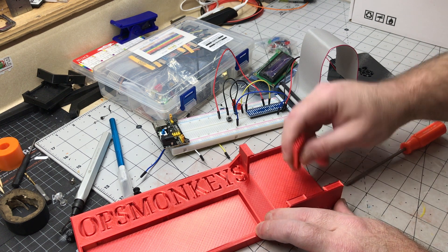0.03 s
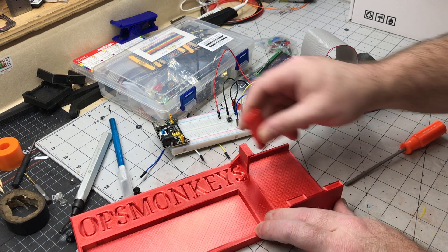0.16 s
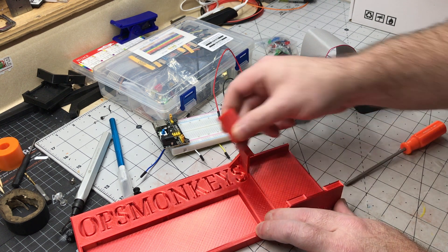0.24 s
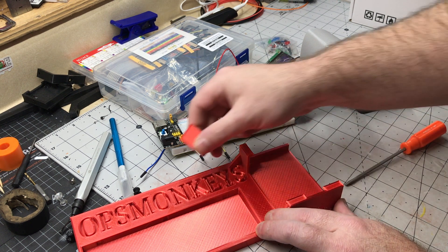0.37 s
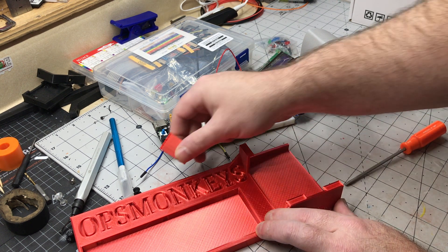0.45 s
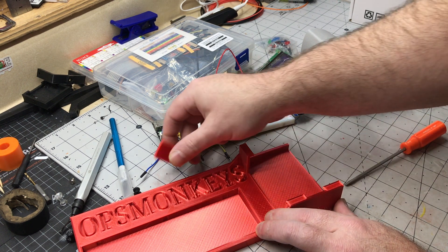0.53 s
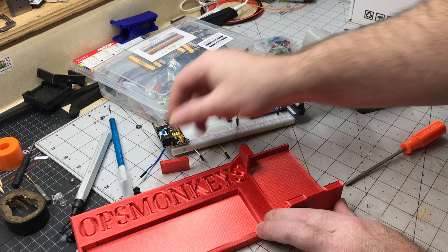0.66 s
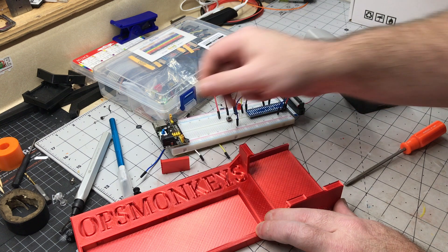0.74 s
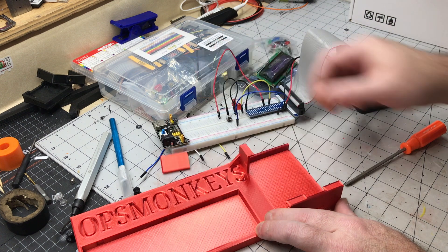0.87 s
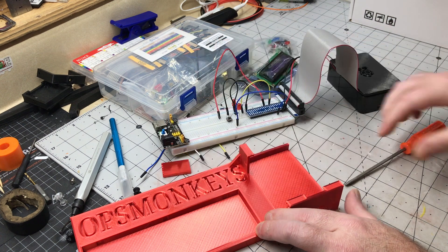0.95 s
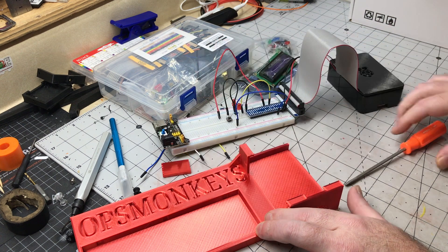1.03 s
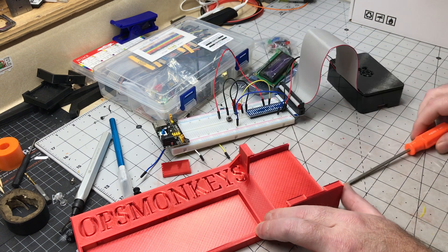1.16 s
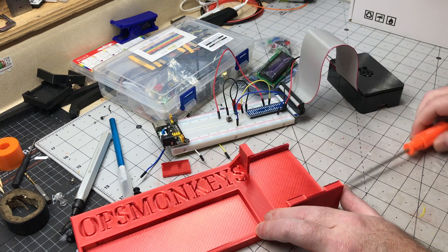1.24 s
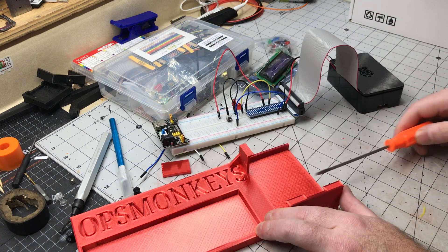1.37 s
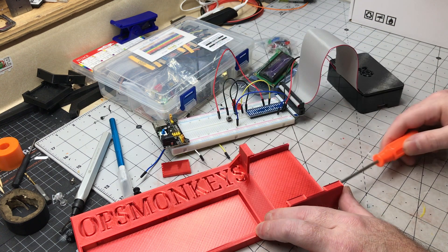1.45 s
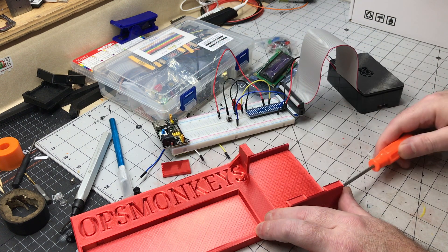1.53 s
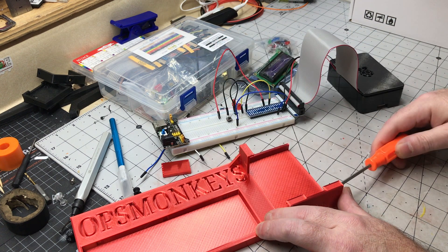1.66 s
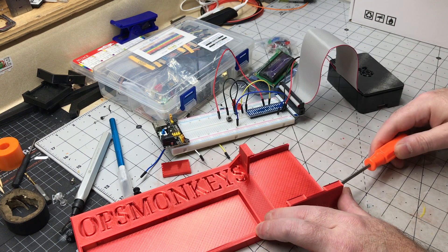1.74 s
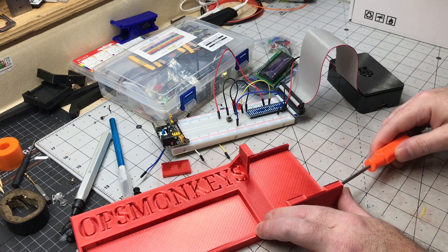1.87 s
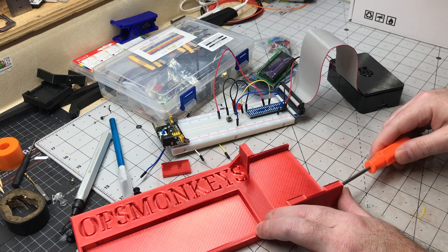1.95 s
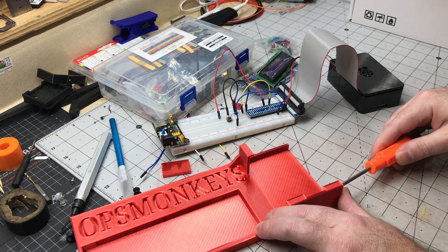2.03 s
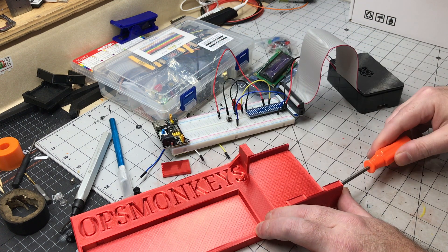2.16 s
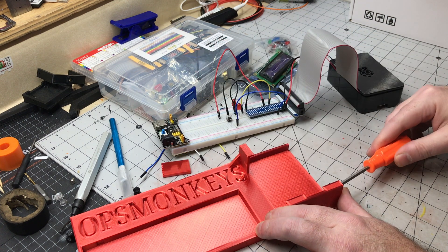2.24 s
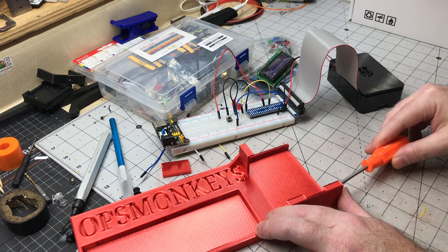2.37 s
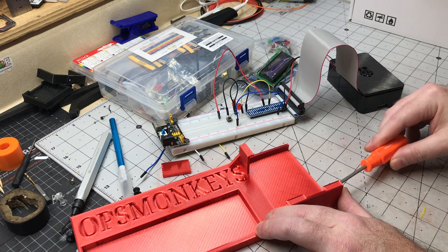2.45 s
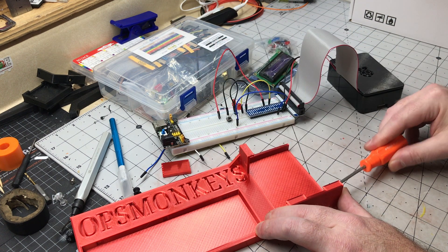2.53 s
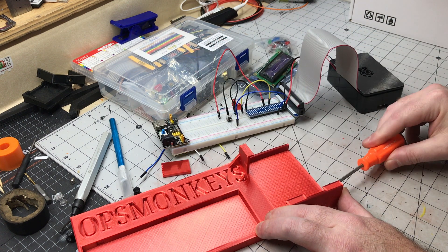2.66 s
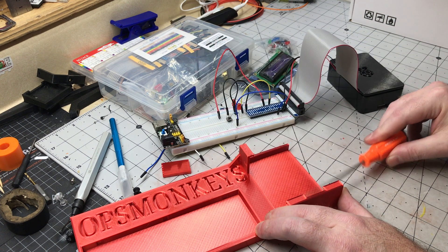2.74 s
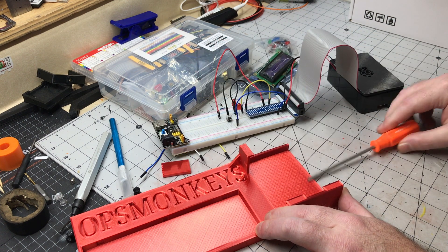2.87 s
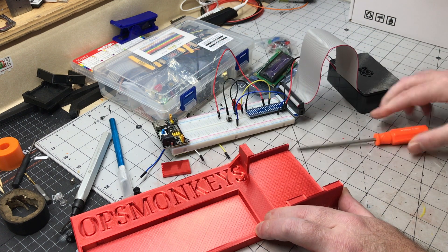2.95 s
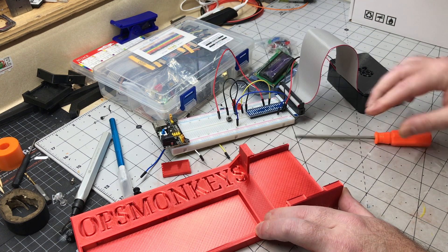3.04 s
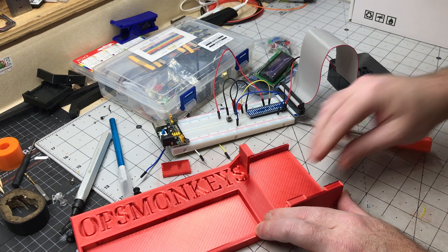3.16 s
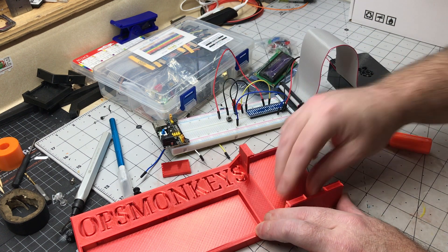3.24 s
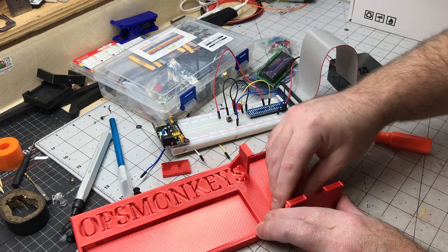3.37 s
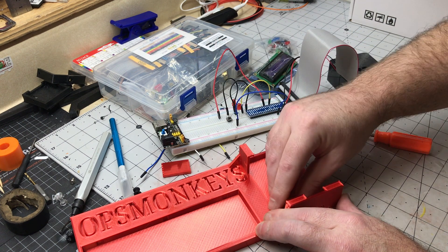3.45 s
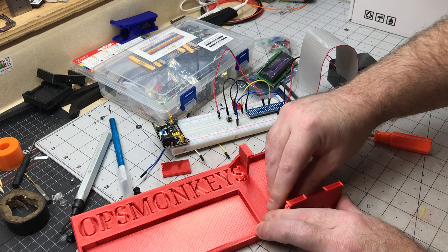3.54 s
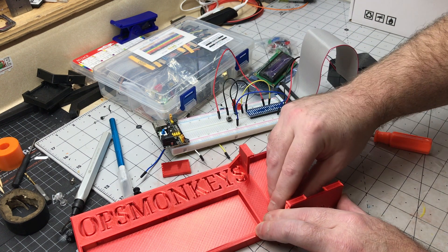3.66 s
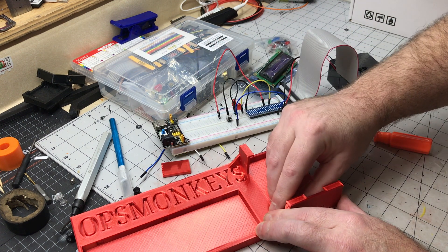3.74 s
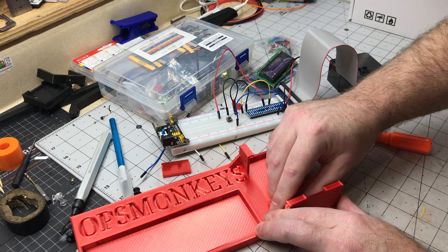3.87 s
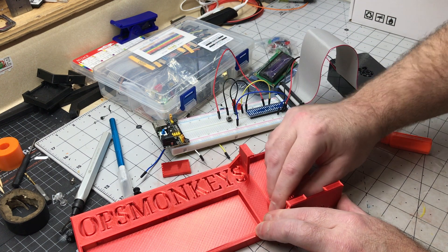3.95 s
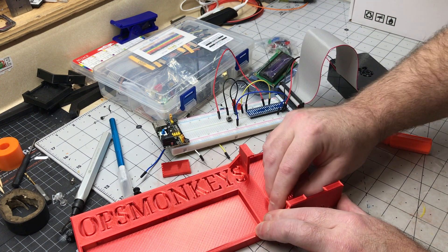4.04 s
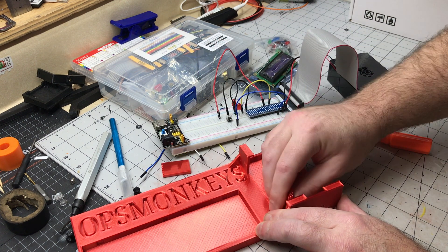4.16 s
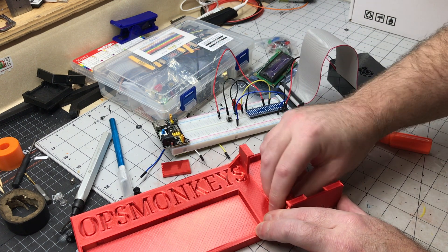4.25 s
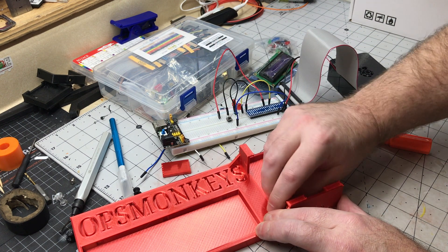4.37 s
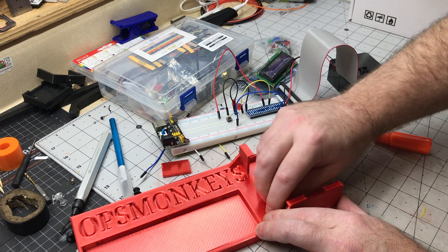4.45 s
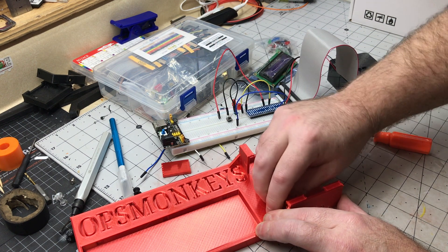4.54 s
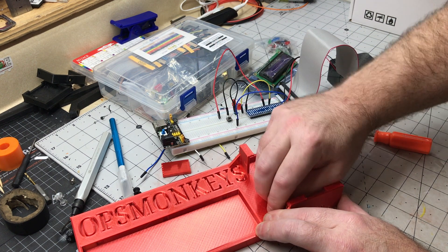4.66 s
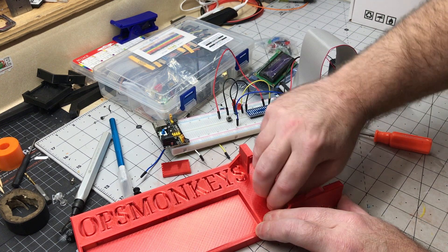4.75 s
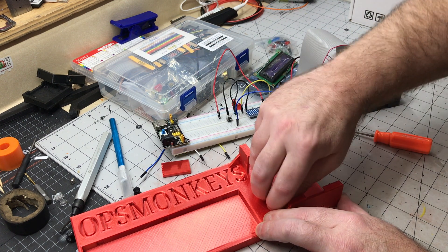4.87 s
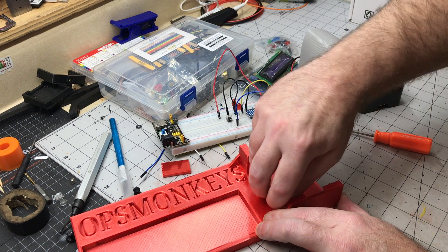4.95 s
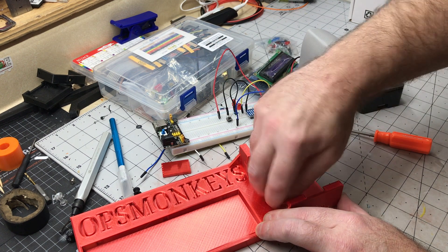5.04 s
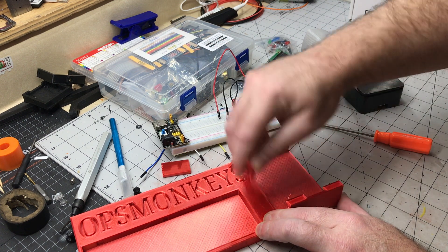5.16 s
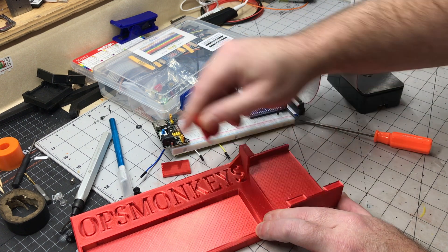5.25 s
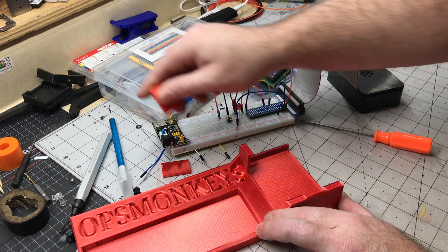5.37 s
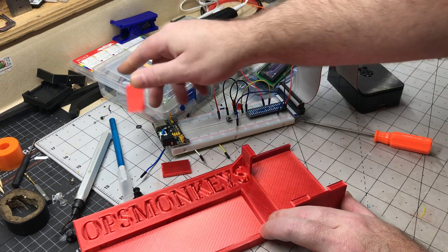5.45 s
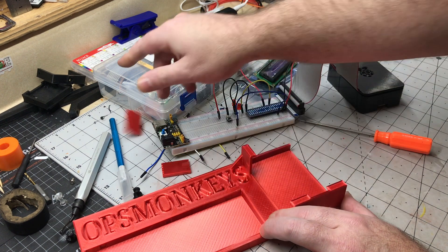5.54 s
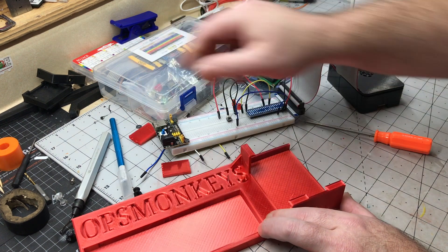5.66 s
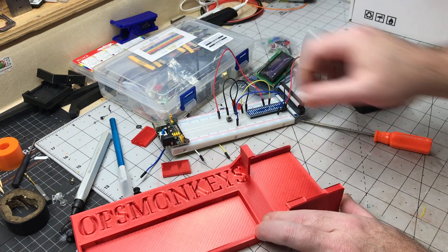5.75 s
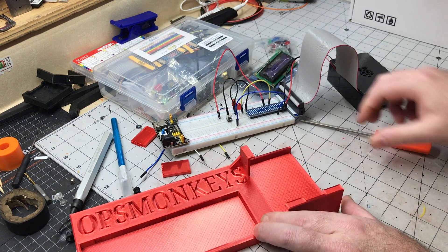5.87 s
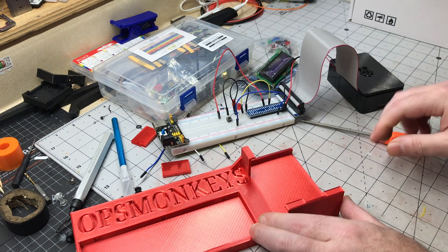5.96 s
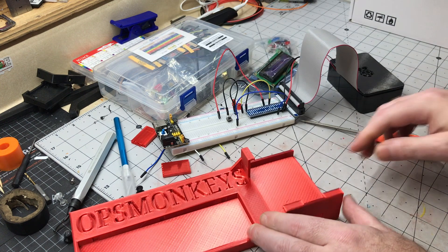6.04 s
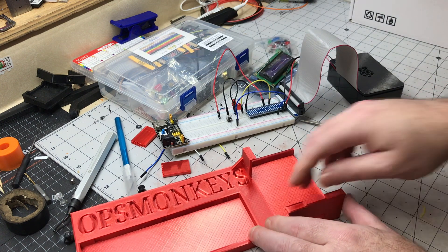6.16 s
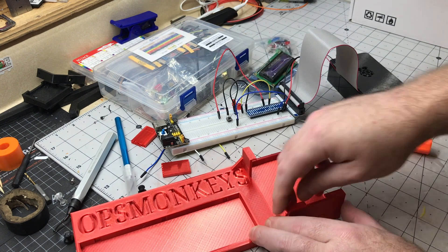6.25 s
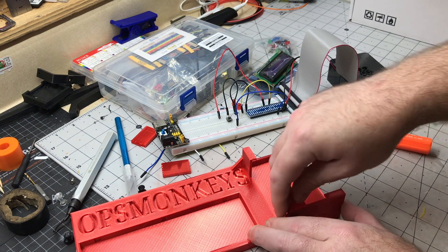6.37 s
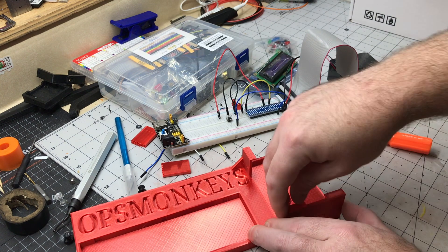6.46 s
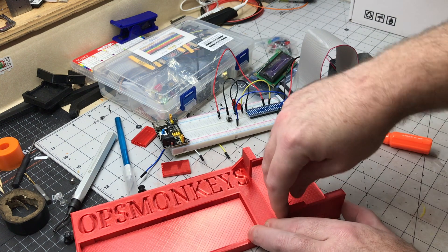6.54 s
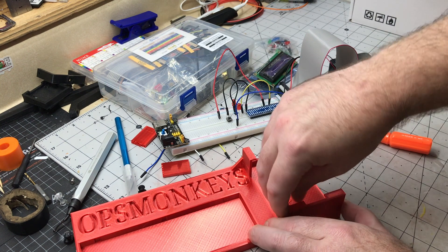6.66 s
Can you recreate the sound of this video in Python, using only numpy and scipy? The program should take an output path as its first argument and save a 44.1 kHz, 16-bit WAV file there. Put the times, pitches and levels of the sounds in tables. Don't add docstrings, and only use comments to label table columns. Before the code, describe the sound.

In a quiet small room, a plastic scrap drops and rattles on a bench mat. A screwdriver clicks into a plastic part, pries with bright crackles and scrapes, and is laid down with a dull knock. Fingers twist faintly with isolated clicks, a support snaps off sharply, and the tossed piece clatters. A few knocks follow, then near silence. Close microphone, dry, short reflections.

```python
import sys
import numpy as np
from scipy import signal
from scipy.fft import rfft, irfft, next_fast_len
from scipy.io import wavfile
from scipy.ndimage import uniform_filter1d, map_coordinates

SR = 44100
rng = np.random.default_rng(int(sys.argv[2]) if len(sys.argv) > 2 else 0)


def transcribe(signal):
    frames = np.atleast_2d(signal).T
    limited = np.clip(frames, -1, 1)
    pcm = np.round(limited * 32767).astype(np.int16)
    wavfile.write(sys.argv[1], SR, pcm)


def voltage_ratio(decibels):
    exponent = np.asarray(decibels, float) / 20
    return 10 ** exponent


N = 295548
SIZE = 16384
HZ = np.fft.rfftfreq(SIZE, 1 / SR)

# t/s, level/dB
HUSH = [(0, -63.5), (.6, -65.5), (1.1, -58), (2.2, -63), (3.3, -58), (3.8, -64), (4.5, -56.5), (5.3, -63),
        (6.4, -57.5)]
# f/Hz, density/dB
AIR = [(26, -64), (45, -22.5), (109, -6), (158, -12.5), (183, -4.5), (306, -2.5), (453, -8.5), (741, -11.5),
       (5040, -34.5), (7470, -41.5), (10500, -42), (16000, -41.5)]
# f/Hz, density/dB
SKIN = [(600, 0), (1500, 2), (3000, -2), (4600, -3), (5800, -1), (7500, -18), (12500, -18), (16000, -20)]
# t of peak/s, level/dB, rise/s, fall/s
SLIDES = [
    (1.14, -54, .15, .45),
    (4.4, -58, .3, 1.4),
    (5.25, -61, .2, .9),
    (6.7, -61, .7, .11),
]
# f/Hz, t60/s
WALLS = [(200, 0.088), (2000, 0.18), (6000, 0.13), (14000, 0.033)]
# t/s, peak/dB
THUDS = [
    (1.048, -58.5),
    (2.886, -47.5),
    (3.298, -70),
    (3.529, -64.5),
    (3.904, -69),
    (4.08, -62),
    (5.023, -53.5),
    (6.047, -61.5),
]

# t/s, peak/dB, favoured mode f/Hz (optional), treble/dB
TICK_HITS = [
    (0.1012, -45, 7000, -23),
]
FLICK_HITS = [
    (0.866, -33, 6550, -4),
    (0.8914, -24, -18),
]
DROP_HITS = [(0.547, -55, 3100, -10), (0.5525, -46, -15), (0.5593, -23, 3200, -22), (0.577, -22, -25),
             (0.5824, -19, -23), (0.5985, -15, -31), (0.627, -10, 2400, -24), (0.6574, -20.5, -28),
             (0.6724, -28, -40)]
LIFT_HITS = [(1.0555, -56, 1220, -4), (1.0984, -40, -20), (1.1055, -28, -34), (1.114, -34, 2300, -38),
             (1.1196, -31, 560, -38)]
SLOT_HITS = [(1.5136, -30, 4680, -14), (1.5213, -31, -14), (1.5522, -13, 4680, -13), (1.5585, -22, -24),
             (1.6314, -24, 4680, -28), (1.6395, -33, 1200, -26)]
PUSH_HITS = [(1.934, -33, 7170, 12), (1.9375, -38, 10), (1.9846, -38, 10), (1.99, -40, 12),
             (2.0005, -44, 10), (2.0309, -24, 1800, -8), (2.0647, -14, -1), (2.1224, -42, 2.5),
             (2.1314, -33.5, 4), (2.1395, -16, 2000, -6), (2.1524, -30, 4), (2.1824, -24.5, 1)]
PRY_HITS = [(2.2445, -12, -9), (2.2491, -24, 2), (2.2736, -6, -14), (2.2752, -8, 3200, -16),
            (2.2929, -21, 3260, -11.5), (2.2982, -31, 4700, -13.5), (2.3184, -15, 5230, -7.5),
            (2.372, -29, 6660, 4), (2.3807, -28, 13200, 8), (2.3862, -24, 4630, 0),
            (2.4994, -35.5, 5750, 0)]
PULL_HITS = [(2.6727, -22.5, 5870, -16), (2.6824, -32, -12.5), (2.6995, -31, -8), (2.7863, -38, 1910, -8),
             (2.797, -25, -14.5), (2.8013, -27, -14), (2.8202, -22, 1960, -20), (2.8242, -22, 1960, -16)]
SCRAPE_HITS = [(2.8412, -16, -19.5), (2.8639, -14, -22), (2.8682, -24, -14), (2.878, -23, -10)]
LAY_HITS = [(2.8888, -12.5, -21), (2.9048, -15, 2130, -20), (2.9414, -30, -26), (2.9494, -31, 2100, -20)]
TWIST_HITS = [(3.1857, -50, 1355, -26), (3.4371, -55, 1727, -16), (3.447, -53, -26),
              (3.684, -60, 3200, -22), (3.867, -64, 5400, -4), (3.879, -56, 5400, -12),
              (3.8927, -19, 5470, -12), (4.0678, -37, 1500, -30), (4.0823, -16.5, -22), (4.3476, -29, -10),
              (4.5604, -38.5, -1.5), (4.567, -24, -22), (4.584, -28.5, -15.5), (4.8384, -35, -12),
              (4.8922, -32.5, -19), (6.4585, -35, -11.5), (6.6163, -32.5, -28)]
SNAP_HITS = [
    (5.002, -22, -8),
    (5.0165, -8.5, -9),
    (5.0242, -16, -10),
    (5.033, -26, -8),
    (5.0394, -26.5, -5),
]
REST_HITS = [(3.5244, -56, -15.5), (5.4543, -58, -20), (5.4925, -52, -20), (5.515, -48, -20),
             (5.535, -50, -20)]
TOSS_HITS = [(5.5152, -24, -16.5), (5.5525, -17, -15.5), (5.6083, -23, -18), (5.6146, -22.5, -9),
             (5.6404, -29, 6200, -4), (5.6555, -31, -20), (5.5072, -30, -25), (5.5327, -21, -16),
             (5.5388, -21, -16), (5.5552, -12, 1850, -14), (5.568, -25, -20)]
SETTLE_HITS = [(5.6729, -25, 1990, -11), (5.681, -41, -24), (5.7022, -31, 6000, -8), (5.7207, -22, -38),
               (5.727, -30, -38), (5.7512, -32, 6900, -6), (5.754, -27, 3300, -26), (5.767, -39, 3300, -28)]
NUDGE_HITS = [(5.9483, -35, 3100, -25), (5.9589, -23, 1500, -17), (5.9638, -17, 1500, -28),
              (5.9778, -30, -22), (6.0235, -27, -38), (6.0372, -14, -26), (6.0465, -21, 900, -30),
              (6.0894, -33.5, 3270, -22.5)]
PICK_HITS = [(5.1847, -46, 6060, -20), (6.1928, -40, 6520, -14), (6.1993, -45, 4600, 2.5),
             (6.2044, -46, 10300, 11.5), (6.2482, -52.5, 10500, 5.5), (6.2933, -59, 4640, -2.5),
             (6.6845, -62.5, 11900, 10)]

# t of peak/s, level/dB, rise/s, fall/s, treble/dB
FLICK_RUBS = [
    (.872, -39, .043, .085, -3),
]
DROP_RUBS = [
    (.568, -28, .012, .11, -18),
    (.635, -43, .005, .15, -24),
]
LIFT_RUBS = [(1.1, -45, .014, .04, -10), (1.122, -47, .02, .05, -30)]
SLOT_RUBS = [(1.526, -32, .023, .08, -12), (1.567, -43, .02, .09, -14)]
PUSH_RUBS = [(1.87, -62, .003, .09, 7), (1.93, -49, .016, .09, 11), (1.99, -51, .004, .09, 14),
             (2.042, -39, .01, .07, 4), (2.072, -42, .006, .05, 2), (2.135, -41, .003, .02, 6),
             (2.148, -41, .006, .03, 2), (2.162, -39.5, .008, .07, 8), (2.186, -42, .012, .06, 8)]
PRY_RUBS = [(2.252, -39, .004, .04, 9), (2.282, -38, .005, .03, 0), (2.301, -27, .005, .11, 3),
            (2.375, -41, .003, .03, 6), (2.503, -50, .005, .025, 3), (2.396, -31.5, .01, .125, 4)]
PULL_RUBS = [(2.68, -35, .003, .11, -2), (2.789, -39, .003, .04, -2), (2.806, -31, .01, .1, -6)]
SCRAPE_RUBS = [
    (2.84, -29, .035, .07, -9),
    (2.874, -29, .04, .014, -7),
]
LAY_RUBS = [(2.914, -31, .02, .05, -16), (2.945, -39, .015, .06, -24)]
TWIST_RUBS = [(3.29, -43, .02, .055, -16), (3.33, -60, .02, .04, -2), (3.44, -61, .03, .04, -10),
              (6.46, -50, .008, .04, -6), (3.9, -26, .008, .115, 2), (4.09, -50, .004, .06, 2),
              (4.79, -58, .004, .02, 4), (4.148, -40.5, .012, .035, -3), (4.36, -50.5, .005, .17, -4),
              (4.5, -58, .003, .14, 3), (4.67, -52, .05, .035, 4), (4.806, -45.5, .012, .085, -3),
              (6.44, -43, .006, .05, -13)]
RING_RUBS = [
    (3.97, -48, .05, .16, -30),
]
SQUEAK_RUBS = [(4.4, -60, .04, .1, -3), (4.54, -60, .06, .14, 0), (4.96, -50, .025, .04, -12),
               (5.2, -60, .05, .16, -4), (6.3, -60, .1, .3, -12)]
SNAP_RUBS = [(4.99, -48, .012, .03, 2), (5.01, -33, .008, .04, 0), (5.035, -32, .012, .13, -3),
             (5.4, -55, .035, .025, -6)]
TOSS_RUBS = [(5.502, -44, .012, .05, -10), (5.53, -26.5, .015, .085, -14), (5.622, -35, .012, .11, -2)]
NUDGE_RUBS = [(5.96, -32, .005, .045, -20), (6.03, -42, .008, .03, -25), (6.1, -44, .045, .06, -9)]

# (f/Hz, width/Hz, level/dB)
TICK_BODY = ([(2940, -61), (5000, -44), (7130, 1), (16000, -65)], [(7590, 36, -6), (12900, 39, -13),
              (14180, 49, -9)])
FLICK_BODY = ([(300, -40), (1200, -22), (2000, -4), (4000, -5), (5500, -12), (9500, -16), (16000, -22)],
               [(1990, 200, 0), (6550, 200, -2), (7630, 150, -7), (8930, 150, -12)])
DROP_BODY = ([(180, -56), (300, -32), (593, -15), (961, -15), (2000, 1), (4090, -11), (4910, -21),
              (16000, -37)], [(592, 70, -11), (1850, 120, -4), (2620, 32, -22), (2960, 57, -10),
              (7700, 150, -20), (9200, 200, -22)])
LIFT_BODY = ([(180, -43), (300, -8), (593, -5), (1010, -23), (1660, -15), (2070, -7.5), (16000, -6)],
              [(560, 33, 10), (1625, 45, 5), (2300, 25, 0)])
SLOT_BODY = ([(180, -55), (400, -30), (1150, -16), (1750, -30), (2400, -8), (3890, -22), (4750, -16),
              (16000, -38)], [(1187, 150, -2), (2400, 240, 2), (3200, 200, -4), (4660, 200, 1),
              (7000, 250, -14)])
PUSH_BODY = ([(350, -54.5), (600, -23), (1750, -8), (1960, -10), (2680, 2.5), (6460, 0), (7830, -1),
              (16000, -1.5)], [(2000, 150, 2.2), (6300, 1100, 3)])
PRY_BODY = ([(350, -50.5), (600, -23.5), (1780, -11), (2440, -4.5), (2680, 0), (4650, 1), (7410, -3),
             (16000, -1.5)], [(2460, 140, -8), (3330, 120, -2), (4600, 120, 1), (13300, 400, -2)])
PULL_BODY = ([(180, -50), (300, -20), (379, -18), (528, -17.5), (1010, -7), (1750, -13), (1900, 0.5),
              (16000, -17)], [(1620, 90, -4), (2960, 140, -2), (7200, 200, -9), (8700, 250, -12)])
SCRAPE_BODY = ([(300, -40), (900, -24), (1400, -8), (1900, -1), (3000, -3), (5000, -10), (16000, -17)],
                [(1620, 90, -1), (2960, 140, 0), (7200, 200, -6), (8700, 250, -9)])
LAY_BODY = ([(88, -28), (250, -12), (612, 0), (1170, -11), (2140, -5.5), (3200, -6), (8900, -24),
             (16000, -47)], [(410, 40, 0), (500, 44, 0), (620, 28, -1), (2130, 79, -18.5)])
TWIST_BODY = ([(650, -63), (1100, -36), (1380, -9), (2520, -8), (3150, -5.5), (4270, -7), (7550, -3),
               (16000, -6)], [(3150, 63, -3.5), (3620, 150, -3), (5490, 140, -8)])
RING_BODY = ([(1000, -60), (16000, -60)], [(3600, 260, 0), (3150, 150, -6)])
SQUEAK_BODY = ([(2000, -40), (4000, -16), (6000, -14), (9000, -18), (13000, -12), (16000, -18)],
                [(4500, 150, 0), (5600, 200, -4), (8600, 200, -6), (12600, 150, -2), (13600, 150, 0),
                (14600, 150, -4)])
SNAP_BODY = ([(180, -32.5), (300, -15), (1060, -12), (1560, -10), (3190, -4.5), (4910, -11.5), (6740, -6),
              (16000, -14.5)], [(3240, 110, -17), (5600, 150, -8.5)])
TOSS_BODY = ([(150, -53), (250, -13.5), (816, -13), (1200, -5.5), (1730, -4.5), (4730, -15.5), (6040, -15),
              (16000, -28)], [(1620, 260, -2), (1954, 28, 1.5), (3200, 510, -10), (5990, 250, -8),
              (7770, 250, -13)])
SETTLE_BODY = ([(500, -45), (1300, -16), (2100, -4), (3400, -6), (4900, -26), (6000, -10), (7800, -14),
                (16000, -28)], [(2130, 70, 6), (3300, 250, -2), (4000, 200, -2), (6000, 250, -4)])
NUDGE_BODY = ([(180, -58), (300, -10.5), (1340, -8), (1970, 0.5), (2650, -5), (3130, -12.5), (5520, -8.5),
               (16000, -93.5)], [(1115, 60, -11), (1510, 140, 5.5), (2120, 150, -3.5), (3230, 150, -5)])
PICK_BODY = ([(2060, -63.5), (3500, -28), (4540, 7), (8210, -11), (9810, 17.5), (12200, 2), (16000, -10)],
              [(4260, 140, 7), (6350, 500, 14), (13700, 300, 8)])

# hits, rubs, body, chatter t60/s, treble edge f/Hz, bass level/dB, usual mode f/Hz
ACTIONS = [
    (TICK_HITS, [], TICK_BODY, .087, 8900, -32, 0),
    (DROP_HITS, DROP_RUBS, DROP_BODY, .02, 5500, -24, 1950),
    (FLICK_HITS, FLICK_RUBS, FLICK_BODY, .03, 5500, -30, 1990),
    (LIFT_HITS, LIFT_RUBS, LIFT_BODY, .04, 5500, -18, 1730),
    (SLOT_HITS, SLOT_RUBS, SLOT_BODY, .04, 5500, -19, 2370),
    (PUSH_HITS, PUSH_RUBS, PUSH_BODY, .035, 5500, -32, 6200),
    (PRY_HITS, PRY_RUBS, PRY_BODY, .03, 5500, -32, 2420),
    (PULL_HITS, PULL_RUBS, PULL_BODY, .04, 5500, -16, 2980),
    (SCRAPE_HITS, SCRAPE_RUBS, SCRAPE_BODY, .03, 5500, -34, 2980),
    (LAY_HITS, LAY_RUBS, LAY_BODY, .045, 5500, -11, 505),
    (TWIST_HITS, TWIST_RUBS, TWIST_BODY, .019, 5500, -32, 3350),
    ([], RING_RUBS, RING_BODY, .05, 5500, -34, 3600),
    ([], SQUEAK_RUBS, SQUEAK_BODY, .05, 5500, -34, 4500),
    (SNAP_HITS, SNAP_RUBS, SNAP_BODY, .03, 5500, -21, 3200),
    (REST_HITS, [], LAY_BODY, .06, 5500, 8, 430),
    (TOSS_HITS, TOSS_RUBS, TOSS_BODY, .04, 5500, -34, 1700),
    (SETTLE_HITS, [], SETTLE_BODY, .05, 5500, -34, 2130),
    (NUDGE_HITS, NUDGE_RUBS, NUDGE_BODY, .035, 5500, -28, 2060),
    (PICK_HITS, [], PICK_BODY, .055, 7670, -32, 0),
]


def unit(x):
    return x / np.sqrt(np.mean(x ** 2) + 1e-20)


def along(points, hz):
    f, v = np.transpose(points)
    return np.interp(np.log(hz + 1), np.log(f + 1), v)


def under(hz, edge_hz):
    return 1 / (1 + (hz / edge_hz) ** 6) + 1e-4


def over(hz, edge_hz):
    return under(edge_hz, hz + 1)


def filtered(x, gain):
    m = next_fast_len(len(x) + SIZE)
    return irfft(rfft(x, m) * gain(np.fft.rfftfreq(m, 1 / SR)), m)[:len(x)]


def add(track, s, x):
    part = track[round(s * SR):][:len(x)]
    part += x[:len(part)]


def wobble(rate_hz, count):
    knots = rng.standard_normal(int(count * rate_hz / SR) + 4)
    return map_coordinates(knots, [np.arange(count) * rate_hz / SR])


def swell(t, s, rise_s, fall_s):
    rise_db = 12 * np.clip((s - t) / rise_s, 0, None)
    fall_db = 30 * np.clip((t - s) / fall_s, 0, None) ** 1.3
    return -rise_db - fall_db


def patchy(spectrum, patchy_db, wide, long):
    z = signal.stft(rng.standard_normal(N), nperseg=512)[2]
    field = uniform_filter1d(rng.standard_normal(z.shape), wide, 0)
    field = uniform_filter1d(field, long, 1)
    noise = signal.istft(z * voltage_ratio(patchy_db * unit(field)), nperseg=512)[1][:N]
    return unit(filtered(noise, lambda hz: voltage_ratio(along(spectrum, hz))))


def hush():
    t = np.arange(N) / SR
    air = voltage_ratio(np.interp(t, *np.transpose(HUSH))) * patchy(AIR, patchy_db=1.5, wide=5, long=12)
    slides = sum(voltage_ratio(db + swell(t, s, rise_s, fall_s)) for s, db, rise_s, fall_s in SLIDES)
    pressure = voltage_ratio(1.5 * wobble(6.5, N))
    return air + slides * pressure * patchy(SKIN, patchy_db=4, wide=4, long=9)


def room(x):
    hz, t, z = signal.stft(rng.standard_normal(SR // 2), SR, nperseg=256)
    decay = voltage_ratio(-60 * t / along(WALLS, hz)[:, None])
    tail = signal.istft(z * decay, SR, nperseg=256)[1]
    delayed = np.pad(x, (130, 0))
    return signal.fftconvolve(delayed, tail / np.linalg.norm(tail))[:N]


def bench():
    out, t = np.zeros(N), np.arange(SR // 2) / SR
    swing = voltage_ratio(-60 * t / .13) * np.sin(2 * np.pi * 75 * t)
    swing += .55 * voltage_ratio(-60 * t / .29) * np.sin(2 * np.pi * 118 * t)
    onset = 1 - np.exp(-t / .0027)
    for s, db in THUDS:
        add(out, s, voltage_ratio(db + 13.5) * onset * swing)
    return out


def colour(body, hz):
    broad, peaks = body
    power = voltage_ratio(2 * (along(broad, hz) - 4))
    for centre_hz, width_hz, db in peaks:
        power = power + voltage_ratio(2 * db) / (1 + (2 * (hz - centre_hz) / width_hz) ** 2)
    return np.sqrt(power) + 1e-6


def causal(gain):
    c = irfft(np.log(gain), SIZE)
    c[1:SIZE // 2] *= 2
    c[SIZE // 2 + 1:] = 0
    return np.exp(rfft(c))


def rubbing(rubs, body, friction):
    slips_hz, rough_db, split_hz, treble_sag_db = 2500, 1.7, 5500, 9
    out, ridges = np.zeros(N), rng.random((2, N))
    rough = rough_db * wobble(160, N)
    for s, db, rise_s, fall_s, treble_db in rubs:
        span = slice(round((s - rise_s) * SR), round((s + fall_s) * SR))
        t = np.arange(N)[span] / SR
        chance, size = ridges[:, span]
        slips = (chance < slips_hz / SR) * size ** 2
        drive = (1 + 2.5 * slips) * friction[span]
        low = unit(filtered(drive, lambda hz: colour(body, hz) * under(hz, split_hz)))
        high = unit(filtered(drive, lambda hz: colour(body, hz) * over(hz, split_hz)))
        bright = voltage_ratio(treble_db - treble_sag_db * np.clip((t - s) / fall_s, 0, 1))
        edges = np.clip(np.minimum((t - t[0]) / (.001 + .15 * rise_s), (t[-1] - t) / .005), 0, 1)
        level = voltage_ratio(db - 3 + swell(t, s, rise_s, fall_s) + rough[span])
        out[span] += edges * level * (low + bright * high)
    return out


def struck(db, t60_s):
    crack_db, crack_grows, crack_t60_s = 17, .25, .0028
    t = np.arange(SIZE // 2) / SR
    crack = voltage_ratio(crack_db + crack_grows * (db + 15) - 60 * t / crack_t60_s)
    chatter = rng.standard_normal(len(t)) * (voltage_ratio(-60 * t / t60_s) + crack)
    chatter *= 1 - np.exp(-t / .0004)
    for delay, strength in rng.random((3, 2)):
        chatter = chatter + .55 * strength * np.roll(chatter, int(8 + 50 * delay))
    return chatter


def contacts(hits, body, t60_s, treble_hz, bass_db, usual_hz):
    out = np.zeros(N)
    middle = over(HZ, 1200) * under(HZ, treble_hz)
    treble = over(HZ, treble_hz)
    bass = under(HZ, 1200) * over(HZ, 260)
    parts = [causal(colour(body, HZ) * share) for share in (middle, treble, bass)]
    for s, db, *spot_hz, treble_db in hits:
        hz = spot_hz[0] if spot_hz else usual_hz * (1 + .04 * rng.standard_normal())
        width_hz = 230 + .055 * hz
        mode = 1j * HZ * width_hz / (hz ** 2 - HZ ** 2 + 1j * HZ * width_hz)
        force = rfft(struck(db, t60_s), SIZE)
        rings = irfft(force * np.array(parts + [mode ** 2]), SIZE)
        mode_db = db - 8 + (max(treble_db, 0) if hz > treble_hz else 0)
        levels_db = [db - 3.5, db + treble_db + 5.5, db + bass_db + 4.5, mode_db]
        add(out, s, voltage_ratio(levels_db) / np.abs(rings).max(axis=1) @ rings)
    return out


def work():
    friction = patchy([(1000, 0)], patchy_db=2.4, wide=3, long=11)
    out = np.zeros(N)
    for hits, rubs, body, t60_s, treble_hz, bass_db, usual_hz in ACTIONS:
        out += contacts(hits, body, t60_s, treble_hz, bass_db, usual_hz)
        out += rubbing(rubs, body, friction)
    return out


def scene():
    near = work()
    return (near + voltage_ratio(-11) * room(near) + bench() + hush())[None]


def low_pass(x):
    return signal.sosfilt(signal.butter(12, 16810, fs=SR, output="sos"), x)


def record(dry):
    def microphone(hz):
        dip = voltage_ratio(-9 / (1 + ((hz - 10400) / 400) ** 2))
        top = .02 + 1 / (1 + (hz / 15850) ** 150)
        return over(hz, 52) * dip * top

    heard = filtered(dry[0], microphone)
    return low_pass(heard[None])


dry = scene()
out = record(dry)
transcribe(out)
```